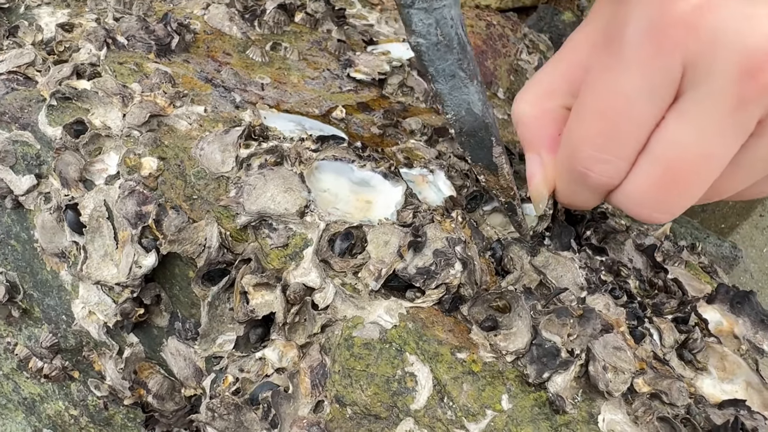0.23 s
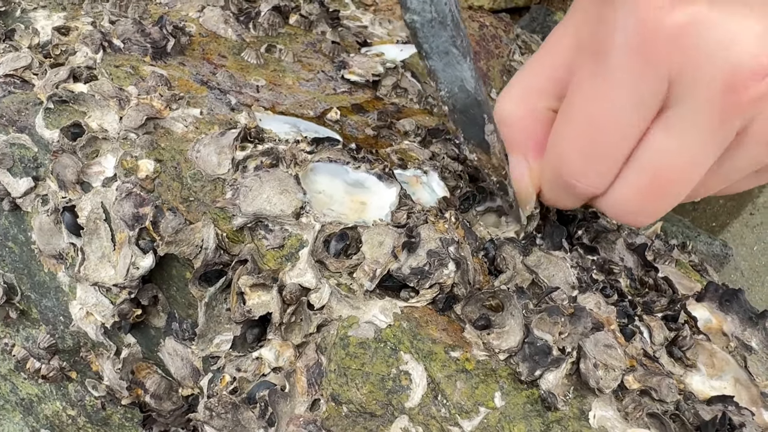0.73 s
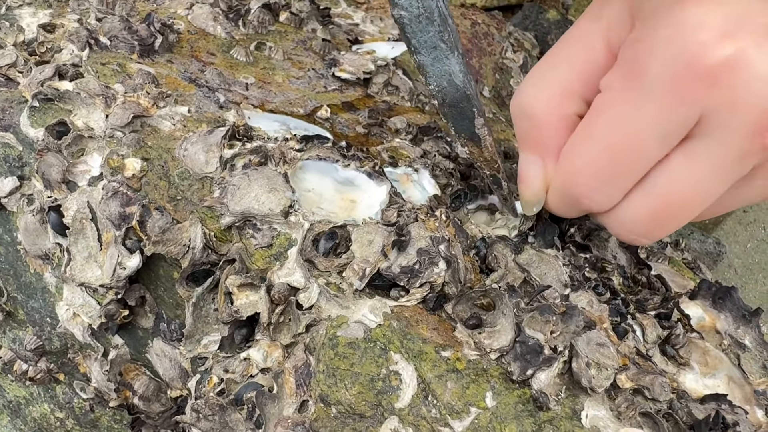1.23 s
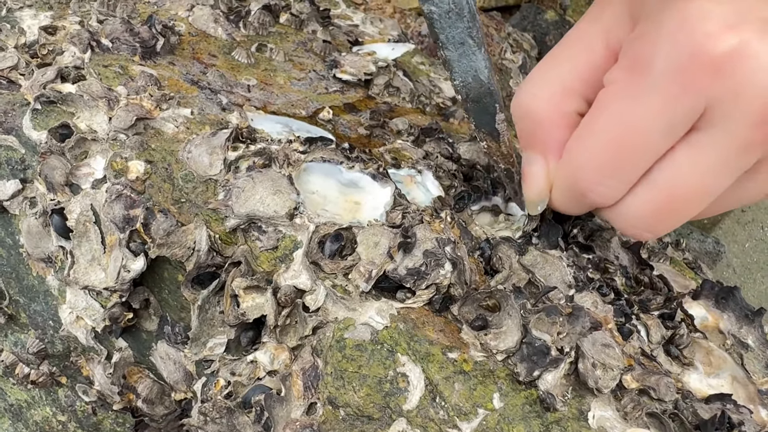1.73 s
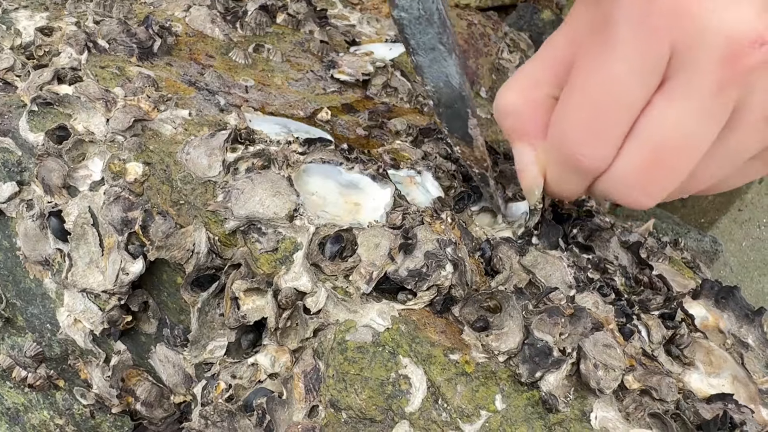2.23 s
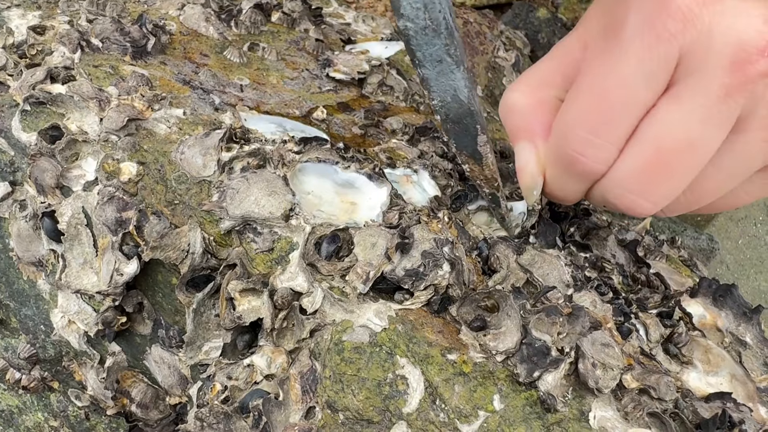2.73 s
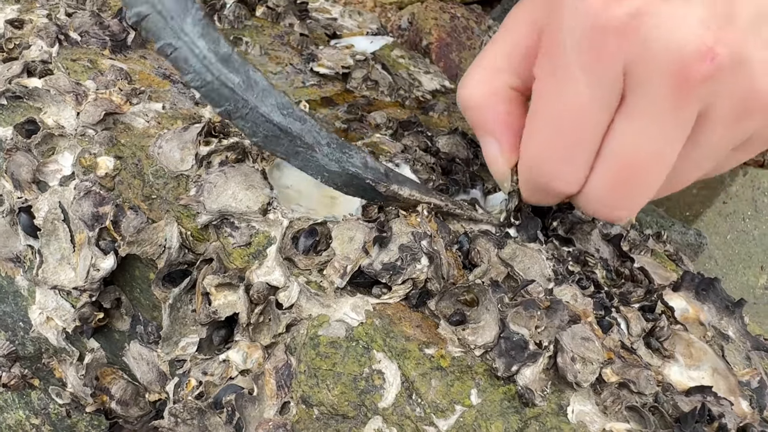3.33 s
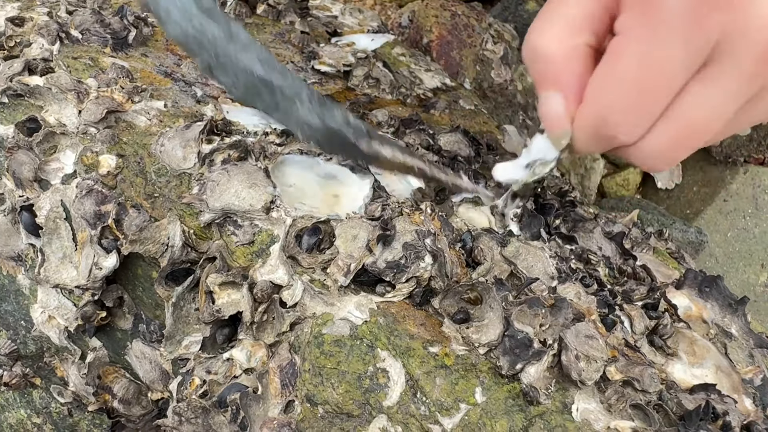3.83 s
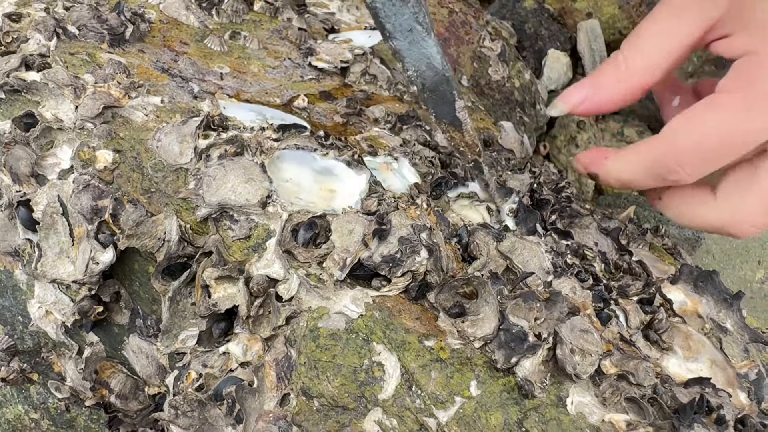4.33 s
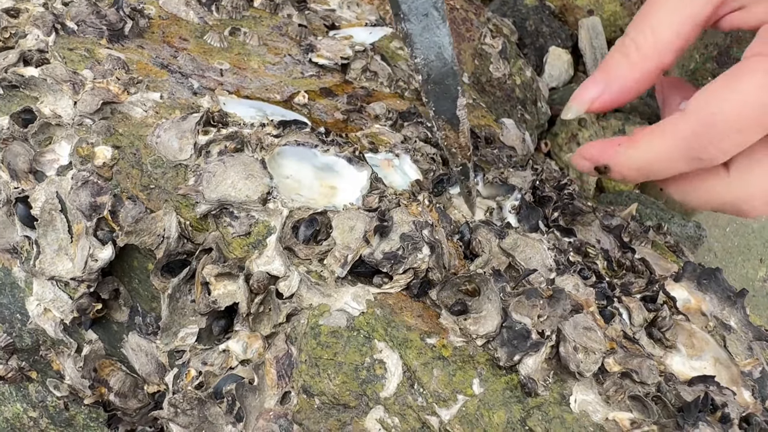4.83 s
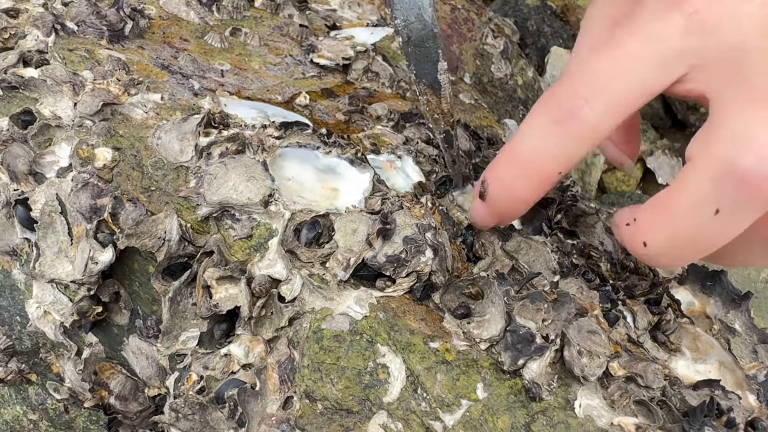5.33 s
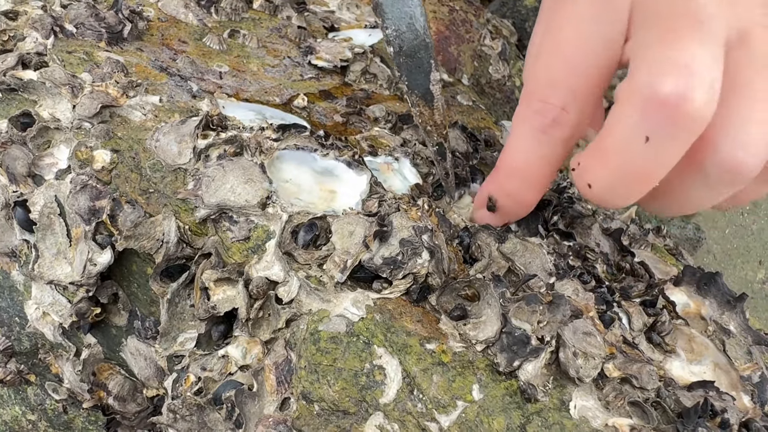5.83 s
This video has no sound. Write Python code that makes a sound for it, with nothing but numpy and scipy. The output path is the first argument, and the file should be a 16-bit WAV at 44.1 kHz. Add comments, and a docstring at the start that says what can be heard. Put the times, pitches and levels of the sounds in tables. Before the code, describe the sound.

A steel blade knocks, cracks and scrapes at an oyster shell on a shore rock, while low wind buffets the microphone, lulling midway.

```python
"""A curved steel blade prises an oyster from a shore rock: shell snaps, crumbles and scrapes close by.
Snaps, strokes and flakes are bursts of micro-fractures, coloured by resonances and scattered by reflections.
The blade knocks dully on the rock and pieces of shell ring: both are sums of damped sine modes.
Wind rumbles on the microphone as shaped noise and single pressure swings, with a lull in the middle.
Behind it are a soft shore hush of steady noise and one thin peep, a wavering sine."""
import sys
import numpy as np
from scipy import signal
from scipy.fft import rfft, irfft, next_fast_len
from scipy.io import wavfile
from scipy.ndimage import uniform_filter1d, map_coordinates

SR = 44100
rng = np.random.default_rng(int(sys.argv[2]) if len(sys.argv) > 2 else 0)


def put_to_file(sound):
    """Save the sound as 16-bit audio at rate SR, in the file named by the first command-line argument."""
    columns = np.atleast_2d(sound).T  # one column per channel
    safe = np.clip(columns, -1, 1)
    whole_steps = np.round(safe * 32767)
    wavfile.write(sys.argv[1], SR, whole_steps.astype(np.int16))


N = 267554


def amp(db):
    """Level definition: decibels to amplitude gain."""
    return 10 ** (np.asarray(db) / 20)


def unit(x):
    """Normalisation by mean power: scale to rms 1."""
    return x / np.sqrt(np.mean(x ** 2) + 1e-20)


def along(points, hz):
    """Logarithmic frequency scale: interpolate (Hz, value) points along it."""
    f, v = np.transpose(points)
    return np.interp(np.log(hz + 1), np.log(f), v)


def curves(rows):
    """Linear interpolation in time: one value per sample for each column after the time."""
    s, *cols = np.transpose(rows)
    return [np.interp(np.arange(N) / SR, s, c) for c in cols]


def filtered(x, response):
    """Linear filtering: multiply the spectrum of x by a response of frequency."""
    size = next_fast_len(N + SR // 2)
    spectrum = rfft(x, size) * response(np.fft.rfftfreq(size, 1 / SR))
    return irfft(spectrum, size)[..., :N]


def causal(colour, size=1024):
    """Minimum phase: folding the cepstrum packs a colour (dB of Hz) into the earliest response."""
    cepstrum = irfft(np.log(amp(colour(np.fft.rfftfreq(size, 1 / SR)))))
    cepstrum[1:size // 2] *= 2
    cepstrum[size // 2 + 1:] = 0
    return irfft(np.exp(rfft(cepstrum)))[:size // 2]


def add(track, s, sound):
    """Superposition: mix a sound into the track at time s."""
    part = track[:, max(round(s * SR), 0):][:, :sound.shape[-1]]
    part += sound[..., :part.shape[-1]]


def rush(colour, side_db):
    """Mid-side decomposition: coloured stereo noise of rms 1, wider with more side signal."""
    mid, side = filtered(rng.standard_normal((2, N)), lambda hz: amp(colour(hz)))
    side = amp(side_db) * side
    return unit(np.array([mid + side, mid - side]))


def wobble(rate):
    """Slow random modulation: a smooth curve with rate knots a second."""
    return map_coordinates(rng.standard_normal(SR // 100), [np.arange(N) * rate / SR], mode="mirror")


def scatter(t60, count):
    """Diffuse reflection: an exponentially decaying noise tail for each port, energy 1."""
    tail = rng.standard_normal((2, count)) * amp(-60 * np.arange(count) / SR / t60)
    return tail / np.linalg.norm(tail, axis=1, keepdims=True)


def fractures(count, rate, spread_db):
    """Random impulse process: micro-breaks, rate a second on average, of widely differing sizes."""
    happens = rng.random(count) < rate / SR
    sign = rng.choice([-1, 1], count)
    return happens * sign * amp(spread_db * rng.standard_normal(count))


# Resonances of the oyster's shell, before random detuning and weighting: centre_hz, width_hz, height_db
SHELL_RESONANCES = [(2650, 400, 5), (4750, 720, 13), (8110, 510, 8), (11640, 500, 4.5), (13600, 730, 12)]
# Broad treble peaks and dips of the microphone ports: frequency_hz, gain_db
PORT_RESPONSE = [(2800, -1), (3550, -1.5), (4750, 3), (6200, 0.5), (7200, 2), (8150, 1.5), (8800, -1),
                 (9600, -9), (10500, 2.5), (11400, 1), (12500, -13), (13500, 0), (14700, -5), (16000, -25)]


def shell(force, body_db, bright_db, ring, piece_hz=10000, piece_db=0, low_db=0, shape_db=3.5):
    """Source-filter principle: resonances and craggy reflections colour tiny fractures; mean port energy 1."""
    piece_width, bump_spacing_hz = 0.17, 260  # width is a fraction of the piece's pitch
    near_db, far_db = -4, -14
    spectrum = [(150, body_db + low_db - 9.5), (550, body_db + low_db + 10.5),
                (1100, body_db + low_db / 2 - 2.5), (2100, body_db + 0.5), (4500, body_db - 6),
                (6300, body_db / 2 - 7.5), (8000, 0), (11000, bright_db - 0.5), (14500, bright_db + 0.5)]
    shift = np.exp(0.014 * rng.standard_normal())  # the resonances move with the point of contact
    bumps = shape_db * rng.standard_normal(80)  # every spot has its own small peaks and dips

    def colour(hz):
        """Resonance: bell-shaped peaks add in decibels to the broad spectrum."""
        peaks = sum(db / (1 + (2 * (hz - shift * centre) / width) ** 2)
                    for centre, width, db in SHELL_RESONANCES)
        piece = piece_db / (1 + (2 * (hz / piece_hz - 1) / piece_width) ** 2)
        spot = np.interp(hz / bump_spacing_hz, np.arange(len(bumps)), bumps)
        return along(spectrum, hz) + ring * peaks + piece + spot + along(PORT_RESPONSE, hz)

    snap = signal.fftconvolve(force, causal(colour))
    near = amp(near_db) * scatter(t60=0.0078, count=2048)
    far = amp(far_db) * scatter(t60=0.053, count=2048)
    paths = near + far
    paths[:, 0] += 1  # the direct sound
    pair = signal.fftconvolve(snap[None], paths, axes=1)
    return pair / np.sqrt(np.sum(pair ** 2) / 2 + 1e-20)


# Shell snaps; level is over 10 ms, brightness tilts treble against body, pitch is that of the piece:
# start_s, level_db, brightness_db, crumbling_time_s, pitch_hz
SNAPS = [(0.2673, -54.5, -9, 0.0022, 13000), (0.2721, -49.5, -3, 0.0042, 9600),
         (0.727, -60, 14, .0007, 13500), (0.7468, -57, 11, 0.00076, 13100), (0.762, -58, 14, .001, 12000),
         (0.7851, -53, 9, 0.0026, 10800), (0.882, -47, 24, .0004, 10800),
         (1.125, -44.5, -1.5, 0.0017, 11000), (1.3225, -36.5, -3, 0.0011, 7800),
         (1.4417, -60.5, 7.5, .0016, 7360), (1.473, -62.5, -7, 0.0012, 11300),
         (1.609, -34, 3.5, 0.0028, 10800), (1.718, -50, -5, 0.0032, 10600), (1.74, -51, -7, 0.0026, 9900),
         (1.902, -51, -0.5, 0.00081, 10200), (2.3328, -57, 22, .0007, 11000),
         (2.4179, -46.5, -0.5, 0.0023, 7600), (2.4336, -42.5, -3, 0.0049, 4900),
         (2.4447, -42.5, 11.5, .0014, 7800), (2.5216, -37.5, 4, 0.0036, 7600),
         (2.546, -50, -4, 0.0035, 5240), (2.752, -50.5, -10, 0.0044, 8150),
         (2.9715, -40.5, 24, 0.0007, 11560), (3.05, -54, -8, 0.001, 8700), (3.142, -46.5, 26, .0005, 9900),
         (3.1507, -51, 20, 0.0013, 10200), (3.186, -53.5, 11, 0.00064, 12500),
         (3.2105, -51, 4, 0.00063, 11200), (3.2597, -52.5, 5, 0.0013, 15110),
         (3.315, -59, -25, 0.0013, 2200), (3.418, -59.5, 16, .0005, 10000),
         (3.539, -46, 13, 0.00035, 14800), (3.5787, -33.5, 16, 0.00054, 12100),
         (3.606, -53.5, -2, 0.00084, 5000), (3.6465, -45.5, 10, 0.00064, 14000),
         (3.6646, -53, 0.5, 0.0026, 13000), (3.6885, -41, 21, 0.00118, 14100),
         (3.701, -54, 0, 0.0016, 12400), (4.0781, -48, 14, .0016, 10800),
         (4.0854, -55.5, -11, 0.0041, 1680), (4.17, -44, 4, 0.0024, 9600), (4.1817, -57, -8, 0.0017, 6800),
         (4.198, -48.5, 10, 0.00074, 11700), (4.2085, -51, 3, 0.00073, 3770),
         (4.2228, -45, 2, 0.0013, 10400), (4.2497, -57, -8, 0.0018, 2250), (4.3379, -59, -13, 0.002, 6600),
         (4.3692, -62, -11, 0.0016, 1400), (4.9883, -49, -3, 0.003, 4700), (5.119, -44.5, 7, 0.0019, 5480),
         (5.134, -52, -4, 0.0012, 5200), (5.151, -51, -1.5, 0.0011, 8100)]


def cracks(first_break=0.29, body_db=-0.5, treble_db=3):
    """Brittle fracture: a break runs on through the layers; flakes are bright, thick pieces dull."""
    out, t = np.zeros((2, N)), np.arange(SR // 50) / SR
    for s, db, bright_db, crumble, hz in SNAPS:
        envelope = np.exp(-(t / (2 * crumble + 1e-4)) ** 2)
        force = fractures(len(t), rate=9600, spread_db=3) * envelope
        force /= np.linalg.norm(force) + 1e-9
        force[0] += first_break
        snap = shell(force, body_db - bright_db / 2, treble_db + bright_db / 2, ring=0.14,
                     piece_hz=hz, piece_db=7, shape_db=2.2)
        add(out, s, amp(db) * np.sqrt(SR / 100) * snap)
    return out


# Strokes of blade or finger over shell: start_s, end_s, level_db, brightness_db
STROKES = [(0.152, 0.175, -68, 2), (0.252, 0.332, -62.5, 6), (0.512, 0.631, -69.5, -3.5),
           (0.705, 0.941, -71, 5.5), (1.26, 1.302, -60.5, -1.5), (1.71, 1.839, -61.5, -1),
           (1.92, 1.954, -59.5, 3), (2.303, 2.357, -67.5, -1.5), (2.433, 2.485, -60.5, -4),
           (2.495, 2.683, -67.5, 0), (2.587, 2.598, -54.5, 4), (2.711, 2.765, -54, 7),
           (2.952, 2.986, -55, -8), (3.026, 3.074, -55.5, -5), (2.986, 3.46, -63.5, 2),
           (3.166, 3.238, -54.5, -1), (3.243, 3.337, -61.5, -5), (3.493, 3.552, -41.5, 3),
           (3.547, 3.576, -55.5, -2), (3.675, 3.714, -58.5, -2), (3.576, 3.63, -45.5, -3),
           (3.708, 3.79, -70.5, 5), (4.178, 4.286, -66, -16), (5.113, 5.173, -62, -7),
           (5.161, 5.226, -64, -4), (5.326, 5.394, -71, -6), (5.523, 5.622, -72, 11)]
SPOT_SAMPLES = SR // 40  # the edge reaches a new spot of shell every 25 ms


def scrapes(body_db=7, treble_db=6):
    """Stick-slip friction: the edge catches and slips; a hard push is dense, steady and makes shell sing."""
    grip_db, grip_rate = 5, 140  # slip depth, and knots a second
    overrun, bite = 0.004, 0.0028  # s beyond each end, s of onset
    out = np.zeros((2, N))
    for start, end, db, bright_db in STROKES:
        t = np.arange(max(round((end - start + 2 * overrun) * SR), SR // 100)) / SR
        effort = min(amp((db + 45) / 2), 1)  # full from -45 dB upward
        slips = map_coordinates(rng.standard_normal(SR // 100), [t * grip_rate], mode="mirror")
        grip = amp(grip_db * (1 - effort / 2) * slips)
        # pressure builds fast and eases slowly
        push = np.sqrt(np.abs(np.sin(np.pi * (t / t[-1]) ** 0.6)))
        push = push * (1 - np.exp(-(t / bite) ** 2))
        grains = fractures(len(t), rate=9000 * effort ** 0.5, spread_db=2.5)
        force = unit(grains * grip * push)
        thin_db = 9 * effort  # pressing harder narrows the sound toward the shell's upper resonances
        for first in range(0, len(t), SPOT_SAMPLES):
            part = force[first:first + SPOT_SAMPLES]
            rasp = shell(part, body_db - thin_db - bright_db / 2, treble_db - thin_db + bright_db / 2,
                         ring=0.34 + 0.88 * effort, low_db=-13 * effort)
            add(out, start - overrun + first / SR, amp(db) * np.linalg.norm(part) * rasp)
    return out


def flakes(rate=18, loudest_db=-57, body_db=-1, treble_db=12, crumble=0.0025):
    """Random chipping: in all but the shortest strokes flakes break off, about rate a second, as bright ticks."""
    pitch_hz, pitch_spread = 9000, 0.27  # centre, and spread of its natural logarithm
    out, t = np.zeros((2, N)), np.arange(SR // 100) / SR
    for start, end, stroke_db, _ in STROKES:
        count = round(rate * (end - start))
        for s in rng.uniform(start, end, count):
            force = fractures(len(t), rate=4600, spread_db=7) * np.exp(-t / crumble)
            force[0] += 1
            size = amp(min(stroke_db - 1, loudest_db)) * np.sqrt(SR / 100)
            piece_hz = pitch_hz * np.exp(pitch_spread * rng.standard_normal())
            tick = shell(force, body_db, treble_db, ring=0.2, piece_hz=piece_hz, piece_db=8.5)
            add(out, s, size * tick)
    return out


# The oyster's root gives way: start_s, end_s, level_db
ROOT_TEAR = (3.577, 3.62, -54)
# Dull colour of the crunch, relative: frequency_hz, level_db
TEAR_COLOUR = [(220, -24), (380, 3), (600, -0.5), (780, -8), (1100, -31), (4000, -70)]


def tear(rate=700, fade_s=0.066):
    """Progressive rupture: the root crumbles off the rock in a short, dull crunch that starts with a jerk."""
    start, end, db = ROOT_TEAR
    out, t = np.zeros((2, N)), np.arange(max(round((end - start) * SR), SR // 100)) / SR
    force = fractures(len(t), rate, spread_db=2) * np.exp(-t / fade_s)
    force[0] += 2
    crunch = signal.fftconvolve(force, causal(lambda hz: along(TEAR_COLOUR, hz)))
    add(out, start, amp(db) * unit(crunch))
    return out


# Blows that reach the rock; level is relative, hardness tilts the modes per octave:
# start_s, level_db, hardness_db_per_octave
BLOWS = [(1.126, -49, -1), (1.3232, -36, 2.5), (1.611, -56, 0), (2.417, -40, 1), (2.55, -58.5, -8),
         (4.989, -48, -3)]
# Modes of the blade, damped by hand and rock; level is relative: frequency_hz, level_db, t60_s
BLADE_MODES = [(490, -1, 0.015), (579, 3, 0.11), (699, -1, 0.06), (850, 1, 0.013), (2060, 2, 0.013),
               (2700, -1, .009), (3300, -3, 0.011), (5150, -8, .006)]


def knocks(level_db=-1, attack=0.00086, thud_db=-3, thud_body_db=20):
    """Impact excitation of damped modes: the blade rings briefly over a dry thud, each blow unlike the last."""
    out, t = np.zeros((2, N)), np.arange(SR // 8) / SR
    hz, mode_db, t60 = np.transpose(BLADE_MODES)[:, :, None]
    for s, db, hardness_db in BLOWS:
        tilt_db = hardness_db * np.log2(hz / hz[0])
        chance_db = 2 * rng.standard_normal(hz.shape)
        strength = amp(mode_db + tilt_db + chance_db - 60 * t / t60)
        modes = strength * np.sin(2 * np.pi * (hz * t + rng.random(hz.shape)))
        ring = np.sum(modes, 0) * (1 - np.exp(-t / attack))
        size = amp(db + level_db) * np.sqrt(SR / 100)
        add(out, s, size * ring / np.linalg.norm(ring))
        thud = shell(np.ones(1), thud_body_db, 0, ring=0, low_db=16.5 - 2 * hardness_db)
        add(out, s, size * amp(thud_db) * thud)
    return out


# Pieces of shell that spring free or are set down, and ring; level is over 10 ms:
# start_s, level_db, pitch_hz, t60_s
RINGING_PIECES = [(1.612, -52, 4640, 0.012), (2.5235, -44.5, 4650, 0.014), (2.9719, -39.5, 4650, 0.016),
                  (2.972, -50, 1830, 0.011), (3.499, -50, 4653, 0.022), (3.519, -50, 4700, 0.022),
                  (3.6058, -53, 4650, .02), (3.665, -59.5, 2060, 0.013), (4.086, -59, 965, 0.022),
                  (2.9722, -49.5, 2740, 0.014), (4.208, -56.5, 3900, 0.013), (4.3682, -48.5, 1250, 0.007),
                  (2.418, -51, 1060, 0.012), (4.9888, -51, 4720, 0.024)]


def clacks():
    """Modal vibration: a small curved piece rings for a moment in a cluster of modes."""
    out, t = np.zeros((2, N)), np.arange(SR // 20) / SR
    modes = [(0.62, -6.5), (0.76, -12.5), (1, 7.5), (1.14, 2), (1.35, -13)]  # (pitch ratio, dB)
    ratio, mode_db = np.transpose(modes)[:, :, None]
    for s, db, hz, t60 in RINGING_PIECES:
        # each port hears it from its own side
        phase = ratio * hz * t + 0.17 * rng.standard_normal((2, len(ratio), 1))
        ring = np.sum(amp(mode_db - 60 * t / t60) * np.sin(2 * np.pi * phase), 1)
        ring = ring * (1 - np.exp(-t * hz))
        add(out, s, amp(db) * np.sqrt(SR / 100) * ring / np.linalg.norm(ring[0]))
    return out


def eddies(spectrum, side_db, span):
    """Power levelling: turbulence noise whose strength stays even over span seconds."""
    noise = rush(lambda hz: along(spectrum, hz), side_db)
    power = uniform_filter1d(np.mean(noise ** 2, 0), int(span * SR))
    return noise / np.sqrt(np.abs(power) + 1e-6)


# Strength of the wind on the microphone, relative: time_s, level_db
WIND_STRENGTH = [(0.0, -31.5), (0.9, -33.5), (0.99, -29), (1.45, -35), (2.24, -31), (2.37, -29),
                 (2.52, -36.5), (2.69, -32), (2.85, -75), (2.96, -63.5), (3.19, -58), (3.32, -40.5),
                 (3.44, -77), (3.84, -84), (3.885, -54), (3.96, -63), (4.14, -35), (4.35, -35),
                 (4.95, -42.5), (5.28, -35.5), (5.39, -43), (5.62, -34), (6.07, -31.5)]
# A soft low rush that swells during the lull, before random lumps: time_s, level_db
LULL_SWELL = [(2.75, -58), (2.95, -63), (3.1, -50), (3.25, -59), (3.38, -47.5), (3.45, -48), (3.48, -61),
              (3.7, -51.5), (3.8, -62)]
# Brief gusts full of small eddies; half length is to 1/e of the lift in dB: centre_s, half_length_s, lift_db
EDDY_GUSTS = [(0.222, 0.023, 10.5), (0.392, 0.051, 7), (2.368, 0.046, 13), (3.35, 0.072, 8)]
# Relative noise spectra of large eddies, deep pressure, small eddies and low rush:
# frequency_hz, level_db_per_hz
BUFFET_SPECTRUM = [(20, -32.5), (45, -24.5), (68, 4.5), (102, -0.5), (135, -9.5), (180, -31), (260, -33.5),
                   (500, -120)]
DEEP_SPECTRUM = [(15, -17), (30, -20), (50, 2.5), (70, -2.5), (110, -31.5), (400, -120)]
FLUTTER_SPECTRUM = [(60, -47.5), (110, -3.5), (150, 4.5), (200, -1.5), (260, -9.5), (340, -21.5),
                    (500, -35), (900, -49), (4000, -120)]
LOW_RUSH_SPECTRUM = [(110, -32), (200, 7), (290, -1.5), (380, -10), (520, -25.5), (1200, -49), (3000, -120)]


def wind(buffet_gain_db=-1, deep_gain_db=-5, flutter_db=-45, usual_db=-33):
    """Turbulent pressure: large eddies follow the wind, deep ones exaggerate it, small ones follow less."""
    deep_growth, flutter_growth = 1.8, 0.42  # dB per dB of wind
    (wind_db,), (swell_db,) = curves(WIND_STRENGTH), curves(LULL_SWELL)
    t, excess_db = np.arange(N) / SR, wind_db - usual_db
    gust_db = sum(db * np.exp(-((t - s) / half) ** 2) for s, half, db in EDDY_GUSTS)
    lump_db = 2.5 * wobble(rate=11)
    buffet_db = wind_db + buffet_gain_db + lump_db / 2
    buffet = amp(buffet_db) * eddies(BUFFET_SPECTRUM, side_db=-15, span=0.077)
    deep_db = usual_db + deep_growth * excess_db + deep_gain_db
    deep = amp(deep_db) * eddies(DEEP_SPECTRUM, side_db=-21.5, span=0.024)
    small_db = flutter_db + flutter_growth * excess_db + gust_db + lump_db
    flutter = amp(small_db) * eddies(FLUTTER_SPECTRUM, side_db=-9, span=0.14)
    low_rush = amp(swell_db + lump_db) * eddies(LOW_RUSH_SPECTRUM, side_db=-20, span=0.076)
    return buffet + deep + flutter + low_rush


# Single eddies that slap the microphone; level is relative: centre_s, level_db, pitch_hz
EDDY_SLAPS = [(0.108, -17.5, 77), (0.175, -34.5, 243), (0.233, -23.5, 144), (0.379, -24.5, 142),
              (0.996, -17.5, 97), (1.586, -27, 156), (1.818, -25.5, 139.9), (2.304, -23, 200),
              (2.315, -16.5, 107.8), (2.333, -23, 97.5), (2.359, -15, 169), (2.381, -16.5, 69.5),
              (2.441, -22.5, 138), (3.893, -44, 80), (4.141, -30, 105), (4.825, -28, 147),
              (5.195, -28.5, 113), (5.269, -28.5, 84), (5.831, -26, 131)]


def puffs(level_db=-1, cycles=0.83, break_ratio=2.54, break_db=-22):
    """Vortex passage: an eddy swings the pressure for about two cycles and sheds a smaller, faster one."""
    out, t = np.zeros((2, N)), np.arange(-SR // 20, SR // 20) / SR

    def swing(hz):
        """Wave packet: a sine of random phase under a bell-shaped envelope."""
        return np.sin(2 * np.pi * (hz * t + rng.random())) * np.exp(-(t * hz / cycles) ** 2)

    for s, db, hz in EDDY_SLAPS:
        pressure = swing(hz) + amp(break_db) * swing(break_ratio * hz)
        add(out, s + t[0], amp(db + level_db) * pressure)
    return out


# Spectrum of the shore hush, relative: frequency_hz, level_db_per_hz
SHORE_SPECTRUM = [(60, -22.5), (170, 4.5), (400, 4), (700, -4), (1200, -10.5), (2700, -16.5), (4600, -23.5),
                  (6500, -34.5), (8300, -28), (11000, -25), (14500, -28.5)]


def shore(level_db=-59):
    """Stationary diffuse noise: the even hush of the open shore."""
    return amp(level_db) * rush(lambda hz: along(SHORE_SPECTRUM, hz) + along(PORT_RESPONSE, hz), side_db=-0.5)


# Glide of the peep, before its waver: time_s, pitch_hz, peak_level_db
PEEP_GLIDE = [(2.638, 3580, -87), (2.652, 3400, -67), (2.666, 3390, -61), (2.682, 3420, -62),
              (2.7, 3430, -64.5), (2.716, 3340, -64), (2.73, 3350, -82.5)]


def peep(waver_hz=12):
    """Frequency modulation: one thin, slightly wavering sine, like a far shorebird."""
    hz, db = curves(PEEP_GLIDE)
    t = np.arange(N) / SR
    hz = hz + waver_hz * unit(filtered(rng.standard_normal(N), lambda f: f < 150))
    sounding = (t > PEEP_GLIDE[0][0]) * (t < PEEP_GLIDE[-1][0])
    return amp(db) * np.sin(2 * np.pi * np.cumsum(hz) / SR) * sounding


# Level difference of the work, left over right: frequency_hz, difference_db
LEFT_OVER_RIGHT = [(400, 5), (2500, 4), (4700, 4.5), (6200, 6), (8000, 1), (11000, 0)]


def scene(lead=0.000016, wind_pan_db=0.56):
    """Interaural-style cues: the left port hears the work louder and lead seconds sooner."""
    def toward_left(hz):
        """Level and phase difference: half for each port, with opposite signs."""
        gain = amp(np.outer([1, -1], along(LEFT_OVER_RIGHT, hz)) / 2)
        return gain * np.exp(1j * np.pi * lead * np.outer([1, -1], hz))

    work = filtered(cracks() + scrapes() + flakes() + tear() + knocks() + clacks(), toward_left)
    air = (wind() + puffs() + shore()) * amp([[wind_pan_db], [-wind_pan_db]])
    return work + air + peep()


TOP_HZ = 16400  # upper band limit


def record(dry):
    """Band limiting: nothing passes at or above the top frequency."""
    return filtered(dry, lambda hz: hz < TOP_HZ)


dry = scene()
out = record(dry)
put_to_file(out)
```